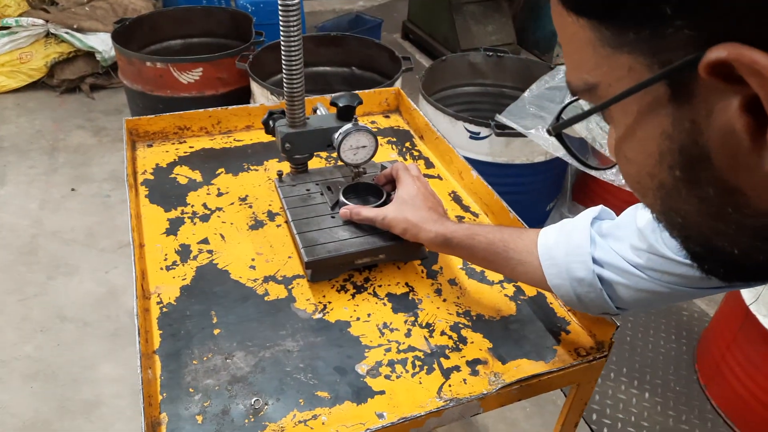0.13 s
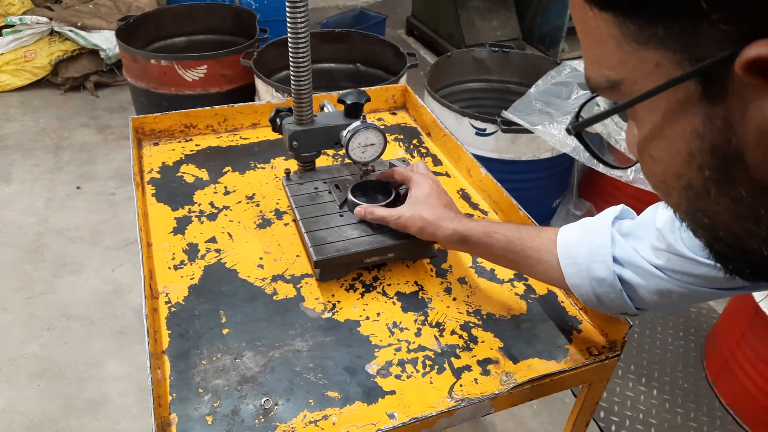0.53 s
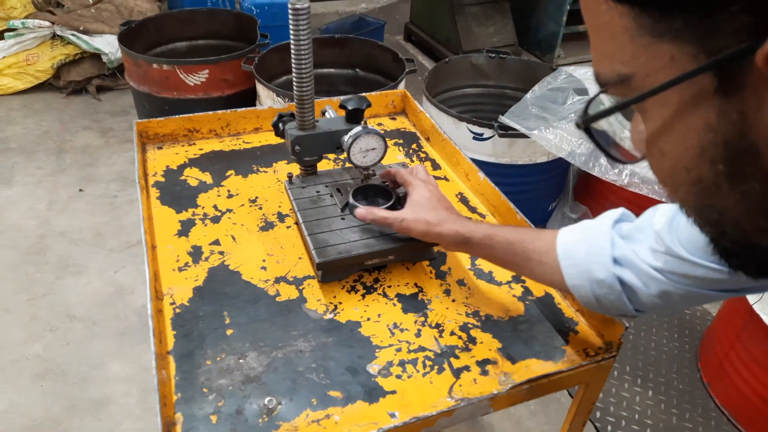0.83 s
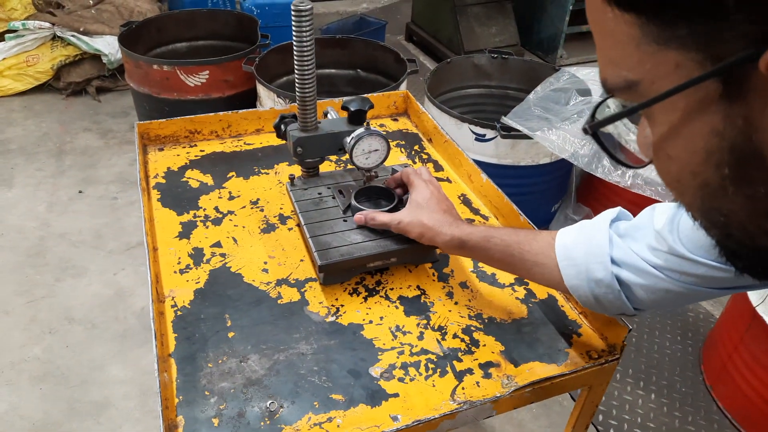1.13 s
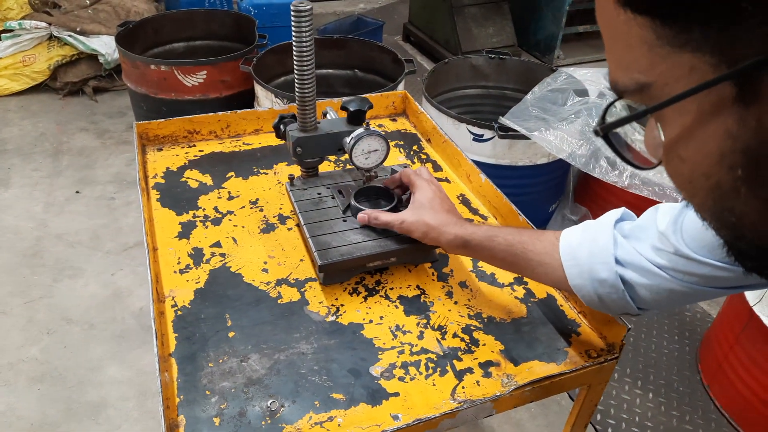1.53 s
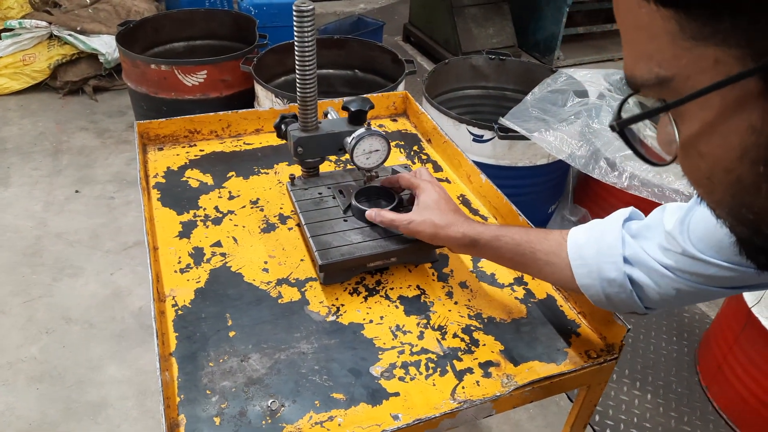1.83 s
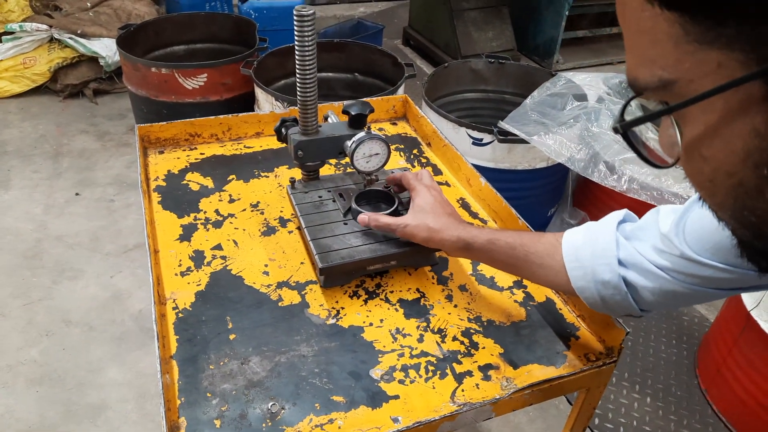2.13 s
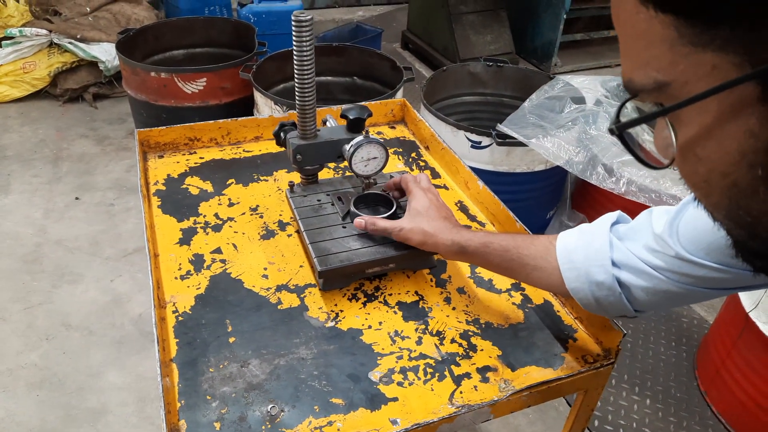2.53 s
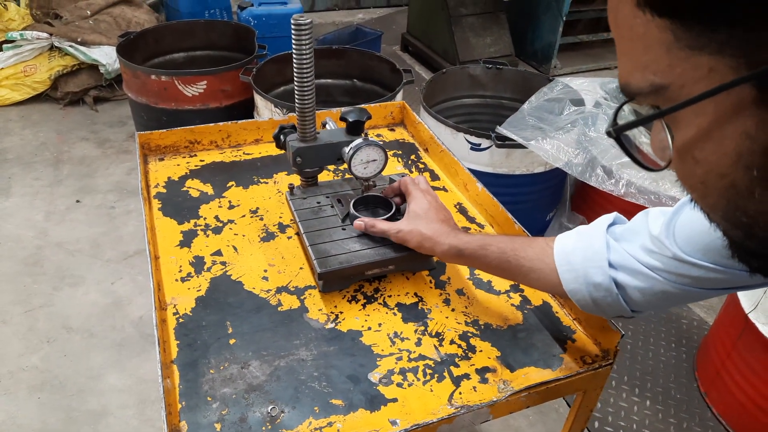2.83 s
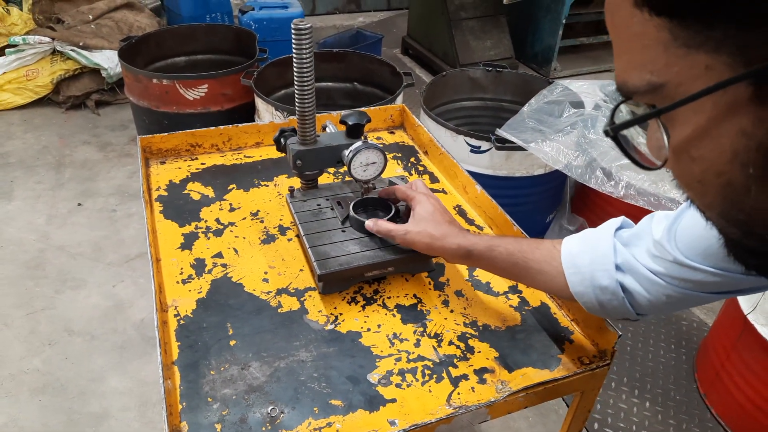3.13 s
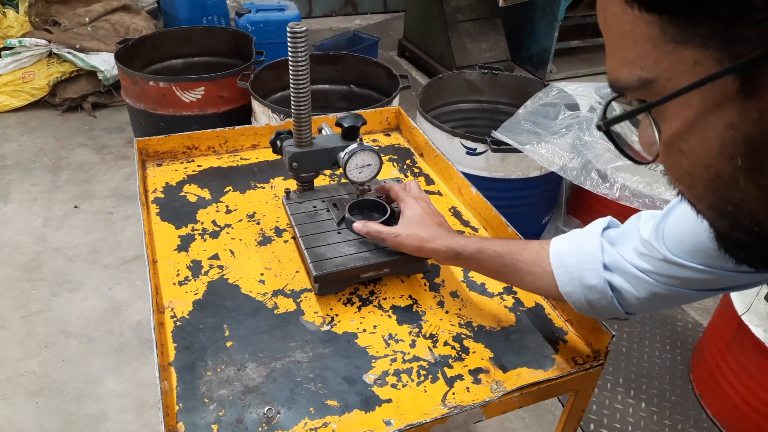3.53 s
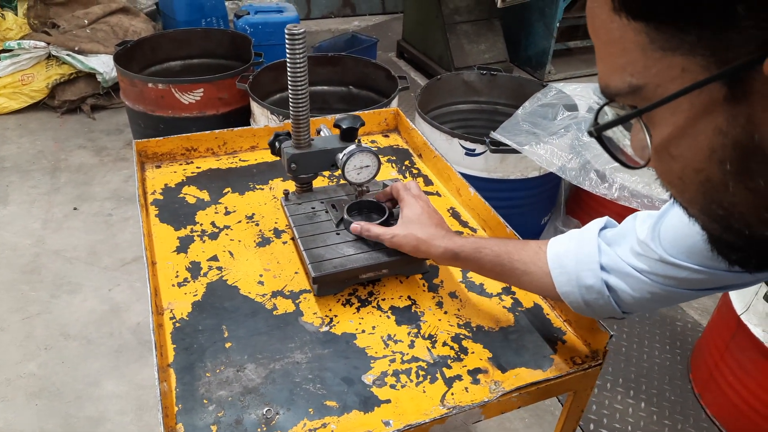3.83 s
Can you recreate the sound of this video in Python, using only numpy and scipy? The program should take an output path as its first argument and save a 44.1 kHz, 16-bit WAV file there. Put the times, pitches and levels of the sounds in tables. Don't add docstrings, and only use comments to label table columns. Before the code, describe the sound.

A steel ring scrapes briefly over a ribbed metal plate, then clinks and rattles to rest, twice, with dull table thumps; close stereo microphone, slightly stronger on the left, in a workshop with distant machine roar.

```python
import sys
import numpy as np
from scipy import signal
from scipy.io import wavfile

SR = 44100
rng = np.random.default_rng(int(sys.argv[2]) if len(sys.argv) > 2 else 0)


def magnitude_from_level(level_db):
    exponent = np.asarray(level_db, float) / 20
    return 10 ** exponent


def wrap_up_sound(samples):
    columns = np.atleast_2d(samples).T
    tamed = np.clip(columns, -1, 1)
    steps = np.round(tamed * 32767).astype(np.int16)
    wavfile.write(sys.argv[1], SR, steps)


N = 176400
LEFT_RIGHT = np.array([[.5], [-.5]])
SWELL_S, CUT_S = 0.0009, 0.00088


def rms_one(x):
    return x / np.sqrt(np.mean(x ** 2) + 1e-20)


def at_hz(points, hz):
    f, value = np.array(points)[:, 0], np.array(points)[:, 1]
    return np.interp(np.log(hz), np.log(f), value)


def drift(rate_hz):
    r = np.exp(-2 * np.pi * rate_hz * 40 / SR)
    slow = signal.lfilter([1], [1, -2 * r, r * r], rng.standard_normal(N // 40 + 2002))[2000:]
    return np.interp(np.arange(N) / 40, np.arange(len(slow)), rms_one(slow))


def resonate(clicks, hz, t60):
    r = magnitude_from_level(-60 / (t60 * SR))
    w = 2 * np.pi * hz / SR
    return signal.lfilter([0, np.sin(w)], [1, -2 * r * np.cos(w), r * r], clicks + 1e-18)


# f/Hz, left over right level/dB
PORT_BALANCE = [(100, 2), (450, 3.5), (800, 4.5), (2200, 5), (5500, 3.5), (7500, 21), (10000, 33.5),
                (13500, 7)]


def pan_db(hz):
    return at_hz(PORT_BALANCE, hz) * LEFT_RIGHT


# f/Hz, coherence/1
PORT_COHERENCE = [(40, 0.7), (110, 1), (250, 0.88), (500, 0.82), (800, 0), (1300, 0.61), (2200, 0.08),
                  (4000, 0.15)]
# f/Hz, lag/samples
PORT_LAG = [(300, 8), (700, 14), (1200, 22)]


def ports(mid, side, hz):
    alike = np.clip(at_hz(PORT_COHERENCE, hz), 0, 1)
    common = np.sqrt(1 + alike) * mid
    different = np.sqrt(1 - alike) * side
    late = np.roll(common - different, int(at_hz(PORT_LAG, hz)))
    return magnitude_from_level(pan_db(hz)) * np.array([common + different, late])


def coloured(white, spectrum, patchy_db):
    out, edges = 0, 25 * 2 ** np.arange(0, 9.5, 1 / 3)
    together = drift(3.3)
    for k, (low, high) in enumerate(zip(edges, edges[1:])):
        hz = np.sqrt(low * high)
        if spectrum[0][0] <= hz and low < spectrum[-1][0] * 1.02:
            band = signal.butter(2, [low, high], "band", fs=SR, output="sos")
            mid, side = signal.sosfilt(band, white[k % 2])
            flicker_db = patchy_db * (.5 * together + drift(13.7))
            out = out + magnitude_from_level(at_hz(spectrum, hz) + flicker_db) * ports(mid, side, hz)
    return out / np.sqrt(np.mean(out.mean(0) ** 2))


# f/Hz, spectral level/dB
ROAR = [(29, -16), (50, -10.5), (253, -12.5), (317, -15.5), (420, -13), (512, -15), (1200, -25.5),
        (1560, -45), (2640, -120)]
# f/Hz, spectral level/dB
HISS = [(710, -4), (1200, -3.5), (2130, -0.5), (3510, -6.5), (3870, -3.5), (6510, -16), (8170, -15.5),
        (9410, -35), (12600, -13), (16000, -16)]


def roar():
    roar_db, hiss_db = 4.5, 4.5
    white = rng.standard_normal((2, 2, N))
    low = magnitude_from_level(roar_db) * coloured(white, ROAR, patchy_db=2.0)
    return low + magnitude_from_level(hiss_db) * coloured(white, HISS, patchy_db=1.2)


# f/Hz, bandwidth/Hz, level/dB over the gain curve
HOUSINGS = [(286.3, 8.3, -8.5), (316.3, 19.7, -0.5), (393, 1.4, -8), (443.4, 22, -11.5), (95, 12, -16.5)]


def hum():
    out = 0
    for hz, width_hz, db in HOUSINGS:
        mid, side = resonate(rng.standard_normal((2, N)), hz, np.log(1000) / np.pi / width_hz)
        out = out + magnitude_from_level(db) * ports(rms_one(mid), rms_one(side), hz)
    return out


# f/Hz, level/dB over the gain curve
MOTORS = [(3750, -11), (3850, -16), (3950, -16), (4050, -14), (4250, -9), (4948, -14)]


def whine():
    t, waver_db, out = np.arange(N) / SR, 1.0, 0
    for hz, db in MOTORS:
        mid, side = [magnitude_from_level(db + waver_db * drift(1.8)) * np.sin(2 * np.pi * (hz * t + rng.random()))
                     for _ in range(2)]
        out = out + ports(mid, side, hz)
    return out


def hall():
    step_hz, step_db, top_hz = 8600, -5, 15750
    out = roar() + hum() + whine()
    below = signal.sosfiltfilt(signal.butter(14, step_hz, fs=SR, output="sos"), out)
    out = below + magnitude_from_level(step_db) * (out - below)
    return signal.sosfilt(signal.ellip(10, .5, 60, top_hz, fs=SR, output="sos"), out)


# t/s, level/dB
HALL_LEVEL = [(0, -43.5), (.45, -41.5), (.75, -35), (.95, -33.5), (1.13, -34.5), (1.16, -37), (1.32, -44),
              (2.3, -44.5), (2.6, -39), (3.05, -32), (3.4, -32.5), (3.45, -42.5), (4, -44)]


def recorder_gain():
    s, db = np.transpose(HALL_LEVEL)
    return magnitude_from_level(np.interp(np.arange(N) / SR, s, db))


# start t/s, end t/s, level/dB
STROKES = [
    (0.731, 1.149, -32.5),
    (3.001, 3.192, -31.5),
    (3.157, 3.404, -39.5),
]
# f/Hz, spectral level/dB
SCRAPE = [(600, -20), (1200, 5), (1900, 6), (4000, -5.5), (12000, -39)]
RING_HZ = [2555, 7203, 12530, 13655]
STIR_DB = [2, -15, -18, -30]


def slides():
    grit_per_s, ring_db, edge_s, t60 = 990, -2.5, 0.042, 0.084
    t, stroke, stirred = np.arange(N) / SR, 0, 0
    for start, end, db in STROKES:
        stroke = stroke + magnitude_from_level(db) * np.clip(np.minimum(t - start, end - t) / edge_s, 0, 1)
    stroke = stroke * magnitude_from_level(0.49 * drift(25))
    size = (2, 2, N)
    strength = magnitude_from_level(1.5 * np.minimum(rng.exponential(1, size), 5))
    grit = strength * rng.choice([-1, 1], size) * (rng.random(size) < grit_per_s / SR)
    for hz, stir_db in zip(RING_HZ, STIR_DB):
        stirred = stirred + magnitude_from_level(stir_db + pan_db(hz)) * rms_one(resonate(grit[0], hz, t60))
    return stroke * (coloured(grit, SCRAPE, patchy_db=5.0) + magnitude_from_level(ring_db) * stirred)


# t/s, level/dB, t60/s
TWISTS = [(0.753, -35, 0.46), (.99, -34, .3), (1.138, -30, .06), (1.191, -36.5, .3), (1.215, -39, 0.39),
          (1.372, -37, 0.17), (3.42, -30.5, .22), (3.465, -36, .4), (3.505, -34, .9), (3.551, -26, 0.21),
          (3.602, -36, 0.12), (3.674, -28, 0.11), (3.717, -38.5, 0.44), (3.938, -43, .2)]


def twists():
    hz, phase_scatter = 4678, .2
    out = np.zeros((2, N + SR))
    waits = np.append(np.diff(np.transpose(TWISTS)[0]), 1)
    for (s, db, t60), until, luck in zip(TWISTS, waits, rng.random((len(TWISTS), 2, 1))):
        t = np.arange(int(min(until, .4) * SR)) / SR
        edges = (1 - np.exp(-t / SWELL_S)) * (1 - np.exp((t - t[-1]) / CUT_S))
        tone = np.sin(2 * np.pi * (hz * t + luck[0] + phase_scatter * luck))
        i = int(s * SR)
        out[:, i:i + len(t)] += magnitude_from_level(db - 60 * t / t60) * edges * tone
    return out[:, :N] * magnitude_from_level(3.4 * drift(40) + pan_db(hz))


# t/s, low mode level/dB, middle mode level/dB, high modes level/dB, table thump level/dB
DROP = [(1.1338, -21, -20, -17, -17), (1.1434, -0.5, -27.5, -23, -8), (1.1602, -7, -19.5, -24, -18),
        (1.1731, -5, -25, -22, -13.5), (1.1807, 3.5, -20.5, -19, -17), (1.1989, -4, -29, -27, -13),
        (1.2115, 0.5, -28, -24, -40), (1.232, -4.5, -30, -24, -27), (1.2582, -8.5, -35, -35, -36),
        (1.277, -5.5, -44, -35, -39), (1.2985, -6.5, -30.5, -31, -24), (1.3295, -13, -41, -44, -28)]
SETTLE = [(1.3658, -13, -32, -21, -12.5), (1.3737, -2, -23, -20, -21.5), (1.3864, -27.5, -33, -40, -15),
          (3.4062, 1, -30, -18.5, -5), (3.4189, -2, -20.5, -16.5, -13), (3.4417, -3, -22, -18.5, -10),
          (3.4636, -21, -26.5, -32, -17.5), (3.496, -18, -30, -34, -39), (3.5493, -7, -19, -17.5, -20.5),
          (3.5557, 0.5, -22, -22, -46), (3.5744, -14, -31, -31, -45), (3.5991, -6, -35, -21, -15.5),
          (3.6082, -7.5, -31, -26, -21.5), (3.6232, -20, -41, -33, -24), (3.647, -13, -45, -37, -50)]
ROCK = [(3.673, -9.5, -28.5, -40, -21.5), (3.6844, -5.5, -35, -33, -33), (3.7163, -14, -34, -34, -51),
        (3.723, -36, -37.5, -33, -55), (3.7764, -20, -29, -27, -19.5), (3.787, -4.5, -22.5, -28, -23.5),
        (3.7982, -18, -27, -34, -44), (3.8151, -14.5, -39, -37, -30), (3.8286, -19, -35, -39, -26),
        (3.9154, -17, -43, -35.5, -41), (3.924, -2, -37, -30, -25), (3.9344, -14, -34, -34, -37),
        (3.9453, -22, -50, -36, -47), (3.9612, -14, -43, -43, -28)]


def touches():
    groups = ((DROP, 1.5), (SETTLE, 1.3), (ROCK, 1))
    return np.array(sorted(tuple(row) + (free,) for rows, free in groups for row in rows))


# split f/Hz, level/dB against its column, t60/s, partner level/dB
MODE_PAIRS = [(42.8, -17.5, 0.18, -4), (49, -2.5, 0.21, -4), (60.6, -7.5, 0.2, -4), (28, -0.5, 0.093, -4)]
MODE_COLUMN = [1, 2, 3, 3]


def clinks(rows):
    grip = 1.004
    wander, low_scatter, beat_spread = .1, .12, 0.83
    out, chance = np.zeros((2, N + SR)), rng.random((len(rows), 4, 3))
    for row, until, luck in zip(rows, np.append(np.diff(rows[:, 0]), 1), chance):
        t = np.arange(int((min(until, .4) + 6 * CUT_S) * SR)) / SR
        shape = (1 - np.exp(-t / SWELL_S)) * np.exp(-np.maximum(t - until, 0) / CUT_S)
        i = int(row[0] * SR)
        for hz, (split_hz, db, t60, partner_db), column, u in zip(RING_HZ, MODE_PAIRS, MODE_COLUMN, luck):
            scatter = low_scatter if column == 1 else 1
            left = wander * u[0]
            phase = np.array([[left], [left + (u[1] - .5) * scatter]])
            turns = hz * (grip if i > 2 * SR else 1) * (t + i / SR) + phase
            partner_turns = turns + split_hz * t + beat_spread * (u[2] - .5)
            pair = np.sin(2 * np.pi * turns) + magnitude_from_level(partner_db) * np.sin(2 * np.pi * partner_turns)
            decay_db = -60 * t / (t60 * row[5])
            out[:, i:i + len(t)] += magnitude_from_level(row[column] + db + decay_db + pan_db(hz)) * shape * pair
    return out[:, :N] * magnitude_from_level(1.2 * drift(70))


# f/Hz, level/dB, t60/s
TABLE_MODES = [(196, 1, 0.075), (287, 1.5, 0.072), (360, 0.5, 0.072), (495, -8.5, 0.069), (669, -4, 0.018)]


def thumps(rows):
    thump_db, table_pan_db = -8, 3.5
    at, out = (rows[:, 0] * SR).astype(int), 0
    for k, (hz, db, t60) in enumerate(TABLE_MODES):
        pushes = np.zeros(N)
        pushes[at] = magnitude_from_level(rows[:, 4] + db + thump_db + rng.normal(0, 2, len(at)))
        out = out + (-1) ** k * magnitude_from_level(table_pan_db * LEFT_RIGHT) * resonate(pushes, hz, t60)
    return out


# t/s, peak level/dB
HARD_TOUCHES = [(1.1341, -17), (1.141, -15.5), (1.1736, -23), (1.251, -32), (1.2795, -26), (1.3662, -17.5),
                (3.091, -22), (3.406, -13), (3.4398, -19), (3.5514, -19), (3.601, -18), (3.6045, -31),
                (3.6753, -25), (3.714, -29), (3.775, -23), (3.79, -25), (3.85, -34), (3.918, -29),
                (3.9237, -24.5), (3.9425, -31)]
# f/Hz, spectral level/dB
CRACK_SPECTRUM = [(500, -16), (3000, 3.5), (6000, -4.5), (8500, -6), (11500, -17), (13500, -2), (16000, -4)]


def cracks():
    crack_db, crack_s, tail_db, tail_s = -1, 0.004, -20, 0.084
    dull_share, bright_hz = 0.64, 6200
    s, peak_db = np.transpose(HARD_TOUCHES)
    hits, fade = np.zeros(N), 0
    hits[(s * SR).astype(int)] = magnitude_from_level(peak_db + crack_db)
    for gain, decay_s in ((1, crack_s), (magnitude_from_level(tail_db), tail_s)):
        fade = fade + gain * signal.lfilter([1], [1, -np.exp(-1 / (decay_s * SR))], hits)
    noise = coloured(rng.standard_normal((2, 2, N)), CRACK_SPECTRUM, patchy_db=1.5)
    dull = signal.sosfiltfilt(signal.butter(3, bright_hz, fs=SR, output="sos"), noise)
    latest = np.clip(np.searchsorted(s, np.arange(N) / SR, "right") - 1, 0, None)
    return fade * (dull + magnitude_from_level(dull_share * (peak_db[latest] + 12)) * (noise - dull))


def scene():
    rows = touches()
    far = recorder_gain() * hall()
    return far + slides() + twists() + clinks(rows) + thumps(rows) + cracks()


def top_cut(x):
    return signal.sosfilt(signal.butter(12, 16520, fs=SR, output="sos"), x)


def record(dry):
    low_hz, cutoff_hz = 55, 16900
    dry = signal.sosfilt(signal.butter(4, low_hz, "high", fs=SR, output="sos"), dry)
    dry = np.clip(dry, -.93, .93)
    mix = signal.sosfilt(signal.cheby2(12, 70, cutoff_hz, fs=SR, output="sos"), dry)
    return top_cut(mix)


dry = scene()
out = record(dry)
wrap_up_sound(out)
```